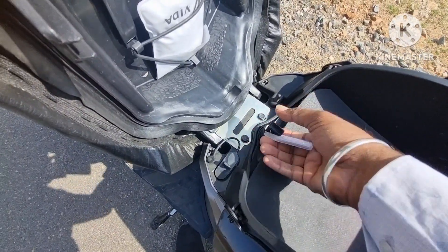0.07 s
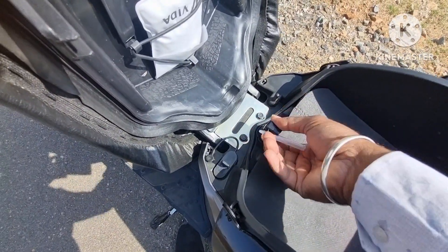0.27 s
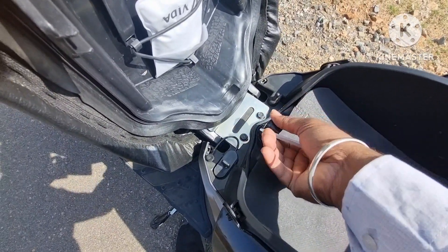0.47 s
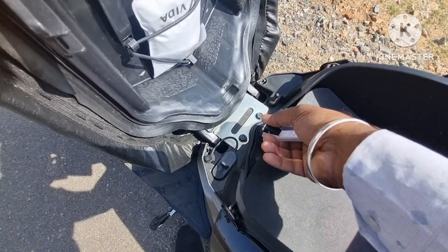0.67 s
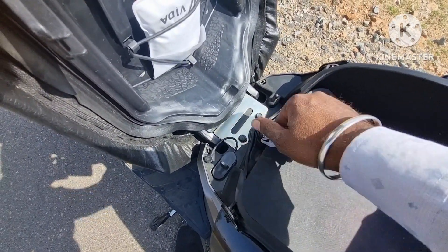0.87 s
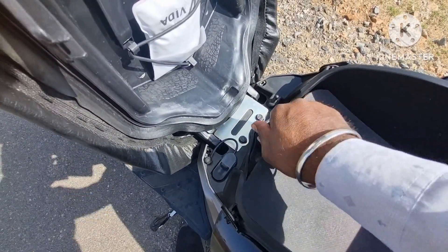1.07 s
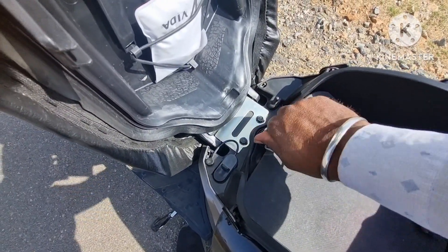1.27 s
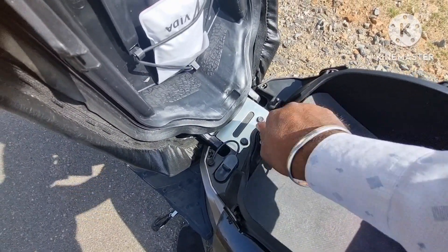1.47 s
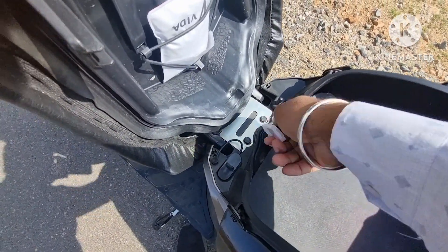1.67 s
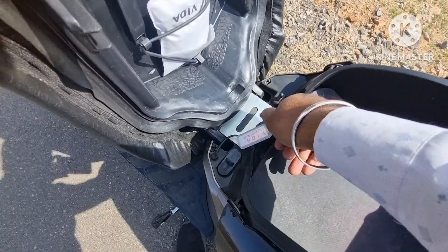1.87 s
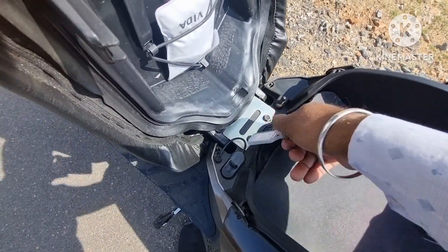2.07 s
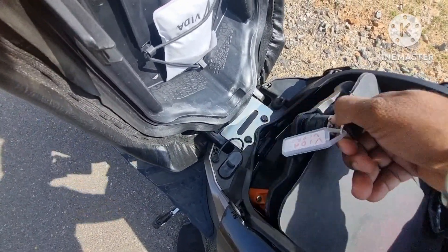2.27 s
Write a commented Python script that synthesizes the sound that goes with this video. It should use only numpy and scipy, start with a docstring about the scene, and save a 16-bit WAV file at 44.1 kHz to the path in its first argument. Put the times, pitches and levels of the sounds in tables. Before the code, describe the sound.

A metal key ticks, rubs and scrapes in a scooter seat lock, close by, with soft thumps from the hollow plastic body. The catch finally springs open with a sharp double clack, over faint outdoor air rumble.

```python
"""Unlocking a scooter seat

Outdoors, a key is worked into the small lock under a scooter seat, turned and drawn out.
The key ticks, rubs and scrapes on the lock, and each push thumps the hollow plastic body.
At the end the catch springs open with a double clack. Low air rumble lies beneath."""
import sys
import numpy as np
from scipy import signal
from scipy.fft import rfft, irfft
from scipy.io import wavfile

SR = 44100
rng = np.random.default_rng(int(sys.argv[2]) if len(sys.argv) > 2 else 0)


def inscribe(sig):
    """Save sig as 16-bit PCM at rate SR to the path in sys.argv[1].

    A 1-D sig is mono; a 2-D sig holds one channel per row.
    Samples are clipped to [-1, 1] before scaling.
    """
    pcm = np.round(np.clip(np.atleast_2d(sig).T, -1, 1) * 32767)
    wavfile.write(sys.argv[1], SR, pcm.astype(np.int16))


N = 102267
TIME = np.arange(N) / SR  # seconds, for the whole scene
HIT = TIME[:int(.2 * SR)]  # seconds, for one short sound
# In all tables, fade_s is the time to die away by 60 dB, left_db is how much louder the left side is,
# and tilt_db is the treble boost per octave. A level_db compares rows within its own table.


def amp(db):
    """Turn decibels into a gain."""
    return 10 ** (np.asarray(db) / 20)


def unit(x):
    """Scale a sound to an average (rms) level of 1."""
    return x / np.sqrt(np.mean(x ** 2) + 1e-20)


def pan(left_db):
    """Left and right gains that place a sound to one side."""
    return amp(np.array([[left_db], [-left_db]]) / 2)


def at_hz(points, hz):
    """Read between the rows of a (pitch_hz, dB) table."""
    pitches, db = np.transpose(points)
    return np.interp(np.log(hz), np.log(pitches), db)


def add(out, start_s, sound):
    """Mix a sound in at its start time."""
    i = max(int(start_s * SR), 0)
    out[:, i:i + sound.shape[-1]] += sound[..., :max(N - i, 0)]


def noise(spectrum, size, tilt_db=0, likeness=0, balance=None):
    """Stereo noise shaped by a spectrum; a likeness of 1 makes both sides alike."""
    hz = np.fft.rfftfreq(size, 1 / SR) + 1
    mid, side = rfft(rng.standard_normal((2, size)))
    opposite = np.array([[1], [-1]])
    both = np.sqrt(1 + likeness) * mid + np.sqrt(1 - likeness) * side * opposite
    if balance is not None:
        both = both * amp(at_hz(balance, hz) * opposite / 2)
    colour_db = at_hz(spectrum, hz) + tilt_db * np.log2(np.maximum(hz, 1000))
    return unit(irfft(both * amp(colour_db), size))


def strike(rise_s, fade_s):
    """The loudness of a blow: it rises quickly to 1, then dies away."""
    shape = (1 - np.exp(-(HIT / rise_s) ** 2)) * np.exp(-np.log(1000) * HIT / fade_s)
    return shape / shape.max()


def ring(tones, rise_s, tilt_db, fade_scale=1):
    """Struck metal rings with several tones, whose strengths vary a little with each blow."""
    out, power = 0, 0
    for hz, db, fade_s, left_db in tones:
        gain = amp(db + tilt_db * np.log2(hz) + 2 * rng.standard_normal())
        wave = np.sin(2 * np.pi * (hz * HIT + rng.random((2, 1))))
        out += gain * pan(left_db) * wave * strike(rise_s, fade_s * fade_scale)
        power += gain ** 2 / 2
    return out / np.sqrt(power)


def echo(sound, spectrum, fade_s, likeness):
    """Blurred reflections: noise that takes up the sound's energy and lets it die away."""
    decay = np.exp(-2 * np.log(1000) / (fade_s * SR))
    power = signal.lfilter([1 - decay], [1, -decay], np.mean(sound ** 2, axis=0) + 1e-18)
    return np.sqrt(power) * noise(spectrum, N, likeness=likeness)


# The tone colour of each background noise: pitch_hz, level_db
RUMBLE_SPECTRUM = [(20, -47), (35, -13.5), (48, 1), (75, -0.5), (100, -4), (160, -16.5), (230, -11),
                   (400, -15), (560, -54.5), (1200, -62), (16000, -81.5)]
HISS_SPECTRUM = [(150, -1), (300, 13.5), (440, 18.5), (580, 4.5), (850, 5), (1500, -2), (2600, -3),
                 (3600, -6.5), (4800, -4), (8000, -10.5), (15200, -8.5), (16500, -47)]
RUSTLE_SPECTRUM = [(150, -16), (350, 10), (600, -5.5), (900, -3.5), (1600, -9), (2400, -10.5), (3300, -22),
                   (16000, -50)]
# How the rumble and the hiss rise and fall: time_s, level_db
RUMBLE_LEVELS = [(0, -49.5), (.2, -49), (.55, -54), (.75, -46.5), (1.1, -53.5), (1.55, -47), (1.9, -43),
                 (2.15, -48), (2.32, -51.5)]
HISS_LEVELS = [(0, -63.5), (.2, -62), (.35, -61.5), (.44, -72.5), (.59, -70.5), (.72, -60), (.85, -63),
               (.98, -58.5), (1.08, -67), (1.25, -56.5), (1.7, -55), (1.82, -61), (1.98, -44.5),
               (2.08, -54.5), (2.22, -52.5), (2.32, -61)]

def outdoor_air():
    """Low rumble, faint hiss and a soft rustle that dies away at the start."""
    rumble_gain = amp(np.interp(TIME, *np.transpose(RUMBLE_LEVELS)))
    hiss_gain = amp(np.interp(TIME, *np.transpose(HISS_LEVELS)))
    rustle_gain = amp(-46) * np.exp(-np.log(1000) * TIME / 0.45)
    rumble = rumble_gain * noise(RUMBLE_SPECTRUM, N, likeness=.78)
    hiss = hiss_gain * noise(HISS_SPECTRUM, N, likeness=0.074)
    rustle = rustle_gain * noise(RUSTLE_SPECTRUM, N, likeness=0.47)
    return rumble + hiss + rustle


def thin_tone():
    """A faint, thin tone hangs in the air for a quarter of a second."""
    out = np.zeros((2, N))
    t = TIME[:int(.25 * SR)]
    tone = amp(-79) * signal.windows.tukey(len(t)) * np.sin(2 * np.pi * 2683 * t)
    add(out, start_s=.989, sound=tone)
    return out


# Pushes on the plastic body: start_s, level_db, pitch_hz, fade_s
BODY_THUMPS = [(0.043, -33, 360, 0.032), (.082, -40, 328, 0.089), (0.119, -35, 250, 0.13),
               (0.148, -29, 227, 0.09), (.153, -30.5, 384, 0.042), (0.254, -42.5, 280, 0.056),
               (.274, -29.5, 307, 0.025), (0.341, -35, 262, 0.029), (0.5993, -19.5, 246, 0.072),
               (0.6022, -28.5, 378, 0.028), (.66, -39.5, 371, 0.3), (0.6868, -24, 257.2, 0.11),
               (0.728, -31.5, 297, 0.027), (0.958, -31.5, 232, 0.054), (0.876, -36.5, 249, 0.035),
               (0.908, -39.5, 336, 0.14), (0.93, -24, 340, 0.037), (.951, -24.5, 285, 0.015),
               (1.034, -35.5, 256, 0.032), (1.102, -37, 285, 0.011), (1.116, -36.5, 357, 0.047),
               (1.206, -25, 285, 0.036), (1.286, -14, 336, 0.021), (1.305, -17, 255, 0.016),
               (1.384, -35.5, 294, 0.04), (1.477, -36, 259, 0.5), (1.523, -15.5, 250, 0.024),
               (1.531, -19.5, 253.3, 0.11), (1.554, -33, 403.6, 0.16), (1.576, -26.5, 254.7, 0.08),
               (1.599, -28, 272, 0.045), (1.685, -30, 288, 0.028), (1.791, -33.5, 301, 0.022),
               (1.8461, -18, 328, 0.021), (1.862, -24.5, 275, 0.019), (1.942, -26, 403.6, 0.11),
               (1.943, -29.5, 238, 0.063), (1.98, -31, 277, 0.034), (2.084, -25.5, 381, 0.023),
               (2.088, -25.5, 275, 0.01), (2.103, -29.5, 273, 0.048), (2.141, -16, 259.4, 0.11),
               (2.157, -17, 271, 0.039)]
# The tone colour of the hollow inside: pitch_hz, level_db
HOLLOW_SPECTRUM = [(100, -34), (200, -20.5), (250, 11), (300, 0), (400, 12), (470, -4), (580, -43),
                   (1000, -18.5), (1600, -43.5), (8000, -72)]

def body_thumps():
    """Each push rocks the plastic panel for a few cycles; the hollow behind it answers."""
    panel = np.zeros((2, N))
    for start_s, db, hz, fade_s in BODY_THUMPS:
        thump = strike(rise_s=0.0034, fade_s=fade_s) * np.sin(2 * np.pi * hz * HIT)
        add(panel, start_s, amp(db + 2) * thump)
    low_band = signal.butter(2, [195, 580], "band", fs=SR, output="sos")
    panel = signal.sosfilt(low_band, panel + 1e-18)
    return panel + amp(-8.5) * echo(panel, HOLLOW_SPECTRUM, fade_s=0.1, likeness=.6)


# The tone colour of the lock's housing: pitch_hz, level_db
HOUSING_SPECTRUM = [(250, -14), (460, 1.5), (600, -11), (830, 1.5), (1080, -11), (1350, -14.5), (1700, -24),
                    (2400, -19.5), (3600, -29), (16000, -79)]

def housing_knock():
    """The housing answers a touch with a dull knock."""
    return amp(-3) * noise(HOUSING_SPECTRUM, len(HIT)) * strike(rise_s=0.0019, fade_s=0.06)


# The tone colour of metal touching metal: pitch_hz, level_db
METAL_SPECTRUM = [(300, -10.5), (600, -13.5), (1000, 3.5), (1500, -1.5), (2600, 4), (3400, -1.5), (4500, 1),
                  (7500, -0.5), (11000, -5), (15200, -5.5), (16200, -29)]
# Which side each part of that sound leans to: pitch_hz, left_db
METAL_BALANCE = [(500, 10.5), (1600, -18.5), (3000, 2), (7500, -2.5), (9500, -21.5), (12000, -17.5),
                 (15000, -10)]
# The tones of the ringing key: pitch_hz, level_db, fade_s, left_db
KEY_TONES = [(2464, -12, 0.039, 24.5), (2870, -16.5, 0.026, 36), (4086, -2, 0.038, 7),
             (4497, -0.5, 0.022, 7.5), (5320, 1, 0.017, 8), (6610, 6.5, 0.017, -4), (7480, -3, 0.025, 15),
             (7740, 6.5, 0.011, 8.5), (8935, 2.5, 0.014, -3.5), (9850, -3.5, .017, -9),
             (10650, -10, 0.013, 15.5), (12200, 5, .022, -2), (14850, 2, 0.024, 2)]
CLICK_RISE_S = 0.00063

def metal_click(tilt_db, fade_s):
    """Metal hits metal: a short crack and the key's brief ring."""
    burst = noise(METAL_SPECTRUM, len(HIT), tilt_db, balance=METAL_BALANCE)
    crack = burst * strike(CLICK_RISE_S, fade_s)
    return crack + amp(-13) * ring(KEY_TONES, CLICK_RISE_S, tilt_db)


# The held key rubs on the lock: start_s, length_s, level_db, pitch_hz, knock_db
KEY_RUBS = [(0.074, 0.017, -63, 3880, -42), (.27, 0.01, -55.5, 2850, -54.5), (0.593, .012, -49, 2800, -48),
            (0.729, 0.0088, -48.5, 2770, -48), (1.55, 0.018, -51.5, 6800, -36.5),
            (1.625, 0.013, -51.5, 3700, -38.5), (1.68, 0.0143, -50.5, 5550, -65),
            (1.736, 0.014, -52, 2820, -45.5), (1.781, .012, -47.5, 2330, -49.5),
            (1.841, 0.0096, -57.5, 6700, -50)]
# The tone colour of a rub: multiple_of_pitch, level_db
RUB_SPECTRUM = [(.2, 1.5), (.75, -10.5), (1, 4.5), (1.3, -11.5), (2.3, -12), (4, -28)]

def key_rubs():
    """Light rubs swell and fade; each spot the key touches has its own pitch."""
    out = np.zeros((2, N))
    for start_s, length_s, db, hz, knock_db in KEY_RUBS:
        swell = np.sin(np.pi * np.minimum(HIT / length_s, 1)) ** 2
        friction = noise([(hz * multiple, level) for multiple, level in RUB_SPECTRUM], len(HIT))
        add(out, start_s, amp(db) * swell * friction * pan(left_db=9))
        add(out, start_s + length_s / 4, amp(knock_db) * housing_knock())
    return out


# The key slides on the lock: start_s, length_s, level_db, tilt_db
KEY_SCRAPES = [(0.123, 0.041, -52.5, 1), (0.285, 0.03, -62, 0.5), (0.919, 0.059, -59.5, -0.5),
               (1.275, 0.02, -42, 1), (1.555, 0.17, -58, -1.5), (1.734, 0.062, -59, -2.5),
               (1.887, 0.026, -48, -5), (1.946, 0.0363, -37.5, -8), (1.992, 0.03, -49, -5),
               (2.136, 0.056, -33.5, -8.5), (2.176, 0.044, -41.5, -3.5)]

def key_scrapes():
    """Sliding metal sticks and lets go in many tiny, uneven slips."""
    slips_per_s, slip_s, edge_s = 2000, 0.00051, 0.0036
    out = np.zeros((2, N))
    for start_s, length_s, db, tilt_db in KEY_SCRAPES:
        slips = rng.random(len(HIT)) < slips_per_s / SR
        grit = unit(signal.lfilter([1], [1, -np.exp(-1 / (slip_s * SR))], slips))  # each slip fades
        stroke = np.clip(np.minimum(HIT, length_s - HIT) / edge_s + .5, 0, 1)
        friction = noise(METAL_SPECTRUM, len(HIT), tilt_db, balance=METAL_BALANCE)
        add(out, start_s, amp(db) * stroke * grit * friction)
    return out * pan(left_db=7)


# The key taps the lock: start_s, tick_db, knock_db, tilt_db, fade_s, left_db
KEY_TICKS = [(.119, -45.5, -42, -1.5, 0.022, 17), (0.1243, -49.5, -39.5, -4, 0.065, 16.5),
             (0.1382, -46, -39, -7, 0.042, 18), (0.1484, -30.5, -34, 0.5, 0.0037, 10),
             (.157, -51, -57, -8, 0.022, 16), (0.9067, -44, -39, -1, 0.0094, 20),
             (.9289, -39.5, -59, -4.5, 0.043, 10.5), (0.9388, -46.5, -41.5, -2.5, 0.11, 8),
             (.953, -44, -43, -4.5, 0.031, 4), (1.115, -54, -49, -12.5, 0.073, -5.5),
             (1.206, -44.5, -42, -16.5, 0.034, -11), (1.268, -42.5, -71, 4.5, 0.027, 11),
             (1.2768, -31, -31, 15, 0.013, 14), (1.289, -23, -37, 0.5, 0.0062, 4.5),
             (1.2922, -22.5, -28.5, -4, 0.025, 3.5), (1.5778, -42.5, -41, 6, 0.012, 11),
             (1.6959, -56, -35, -14, .02, 16), (1.8809, -32, -55, 5.5, 0.018, 8.5),
             (1.8942, -39, -44, -4.5, 0.022, 14), (1.8976, -38, -66, 3, 0.0085, 19),
             (1.901, -38, -38, 1, 0.021, 5), (1.9193, -40, -41, -1, 0.0092, 8),
             (1.9393, -35.5, -37, -4, 0.047, 10), (1.9447, -32, -24.5, -3.5, 0.049, 9.5),
             (1.975, -37.5, -41, 0, 0.016, 17), (1.9899, -39, -55, -2, 0.008, 13),
             (2.007, -34.5, -52, 2.5, 0.013, 15.5), (2.083, -44, -30.5, -11, 0.019, 8),
             (2.105, -35.5, -51, -4, .045, 9), (2.116, -35.5, -33.5, -16, 0.029, -6),
             (2.278, -52.5, -53.5, -9, 0.013, 12)]

def key_ticks():
    """The key ticks on the slot and its pins, with a dull knock from the housing."""
    out = np.zeros((2, N))
    for start_s, tick_db, knock_db, tilt_db, fade_s, left_db in KEY_TICKS:
        tick = amp(tick_db) * pan(left_db) * metal_click(tilt_db, fade_s)
        add(out, start_s, tick + amp(knock_db) * housing_knock())
    return out


# The key's tip snaps into the slot: start_s, level_db
KEY_SNAPS = [(.6608, -28), (0.6625, -27)]

def key_snaps():
    """The tip slips in with a thin double snap, mostly the free ring of the blade."""
    out = np.zeros((2, N))
    for start_s, db in KEY_SNAPS:
        click = amp(-5.5) * metal_click(tilt_db=2, fade_s=0.018)
        blade = ring(KEY_TONES, CLICK_RISE_S, tilt_db=2)
        knock = amp(-12.5) * housing_knock()
        add(out, start_s, amp(db) * (blade + click + knock))
    return out * pan(left_db=0.5)


# The catch lets go, then hits its stop: start_s, click_db, plate_db, plate_tilt_db, left_db
CATCH_CLACKS = [(2.1396, -15, -9, 8.5, 2.5), (2.1544, -16.5, -6.5, 14.5, 5)]
# The tones of the lock plate: pitch_hz, level_db, fade_s (shortened by fade_scale below), left_db
PLATE_TONES = [(750, -0.5, 0.073, 2), (847, 2, 0.054, -7), (1101, 2.5, 0.017, -5), (1536, -8, 0.065, -10),
               (1718, 2, 0.03, 2.5), (1925, -3, 0.012, -11), (2047, -18.5, 0.03, 11), (2600, -37, 0.076, 6),
               (2860, -30, 0.05, -3)]

def catch_clacks():
    """A spring drives the catch, which strikes the lock plate twice and makes it ring."""
    out = np.zeros((2, N))
    for start_s, click_db, plate_db, plate_tilt_db, left_db in CATCH_CLACKS:
        click = amp(click_db) * pan(left_db) * metal_click(tilt_db=-3.2, fade_s=0.036)
        plate = amp(plate_db) * ring(PLATE_TONES, rise_s=0.002, tilt_db=plate_tilt_db, fade_scale=0.77)
        add(out, start_s, click + plate)
    return out


def scene():
    """The lock and plastic body close by, with faint reflections from the seat, in outdoor air."""
    metal = key_ticks() + key_snaps() + key_rubs() + key_scrapes() + catch_clacks()
    reflections = amp(-26) * echo(metal, METAL_SPECTRUM, fade_s=0.19, likeness=0)
    return metal + reflections + body_thumps() + outdoor_air() + thin_tone()


def record(dry):
    """Round off the loudest peaks and cut the very highest treble."""
    treble_cut = signal.cheby2(16, 60, 16600, fs=SR, output="sos")
    return signal.sosfilt(treble_cut, np.tanh(dry))


dry = scene()
out = record(dry)
inscribe(out)
```